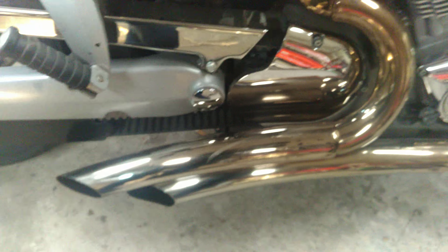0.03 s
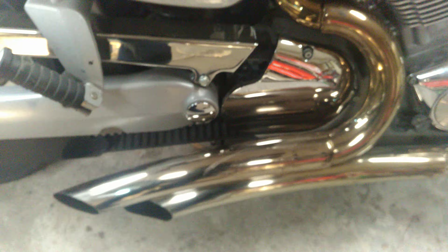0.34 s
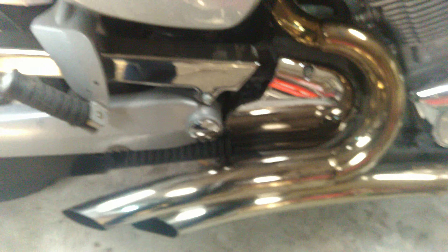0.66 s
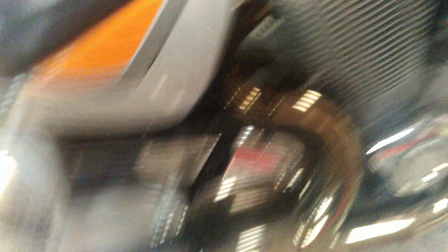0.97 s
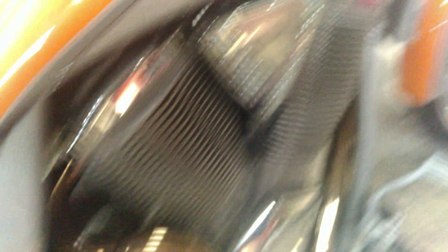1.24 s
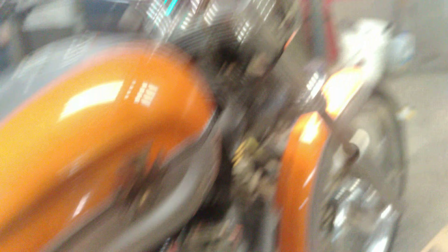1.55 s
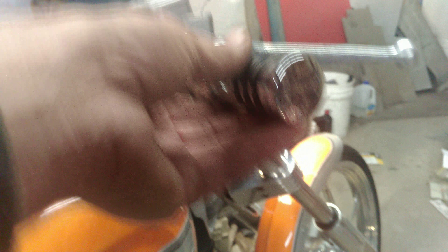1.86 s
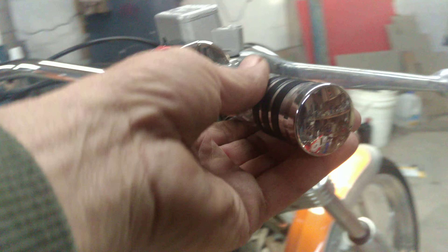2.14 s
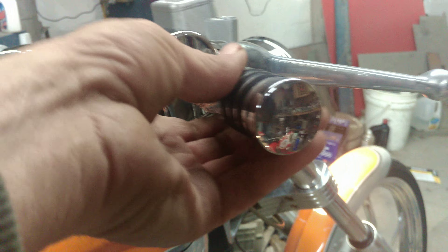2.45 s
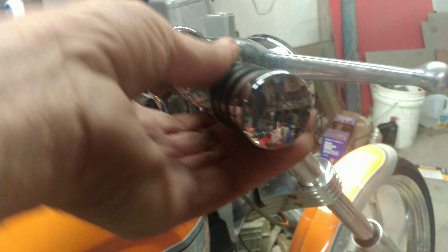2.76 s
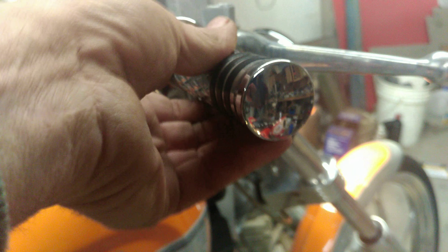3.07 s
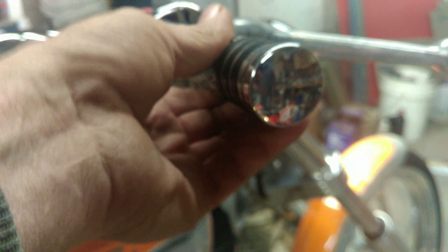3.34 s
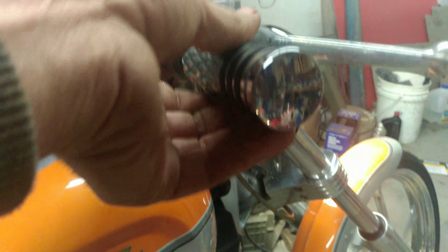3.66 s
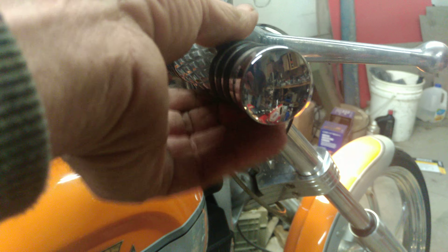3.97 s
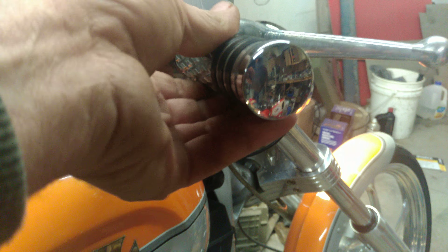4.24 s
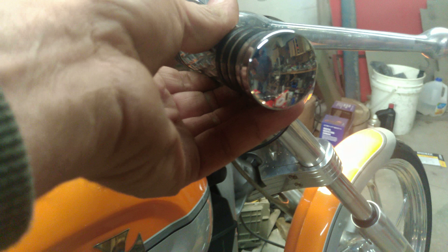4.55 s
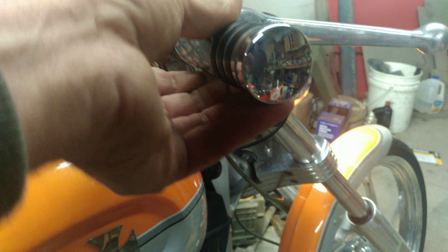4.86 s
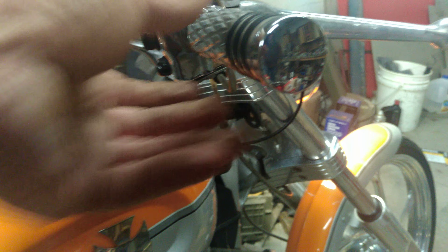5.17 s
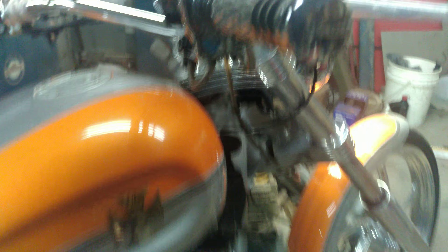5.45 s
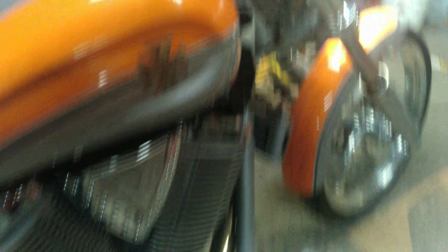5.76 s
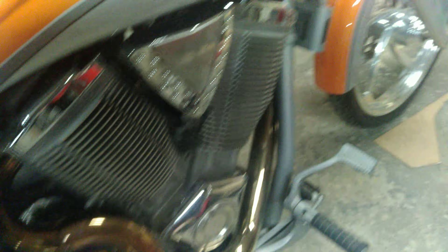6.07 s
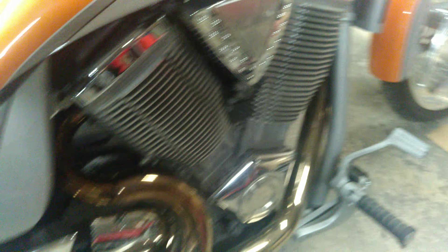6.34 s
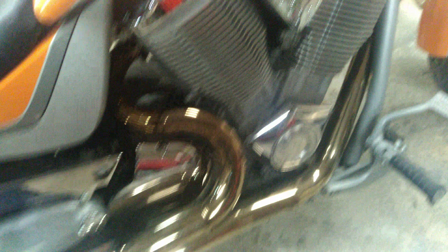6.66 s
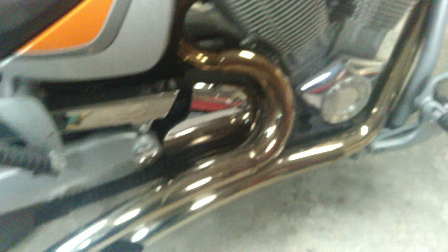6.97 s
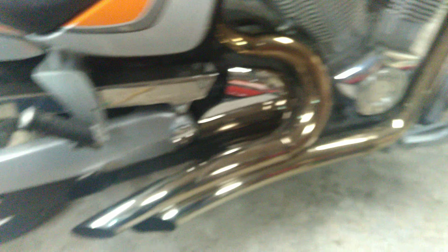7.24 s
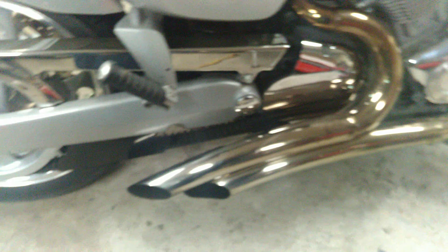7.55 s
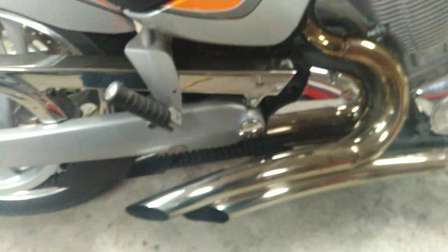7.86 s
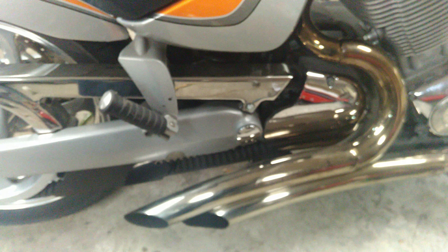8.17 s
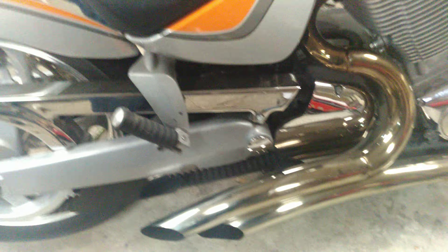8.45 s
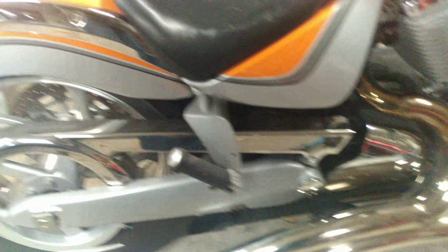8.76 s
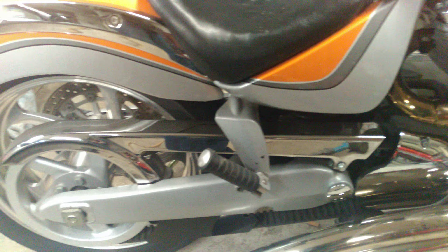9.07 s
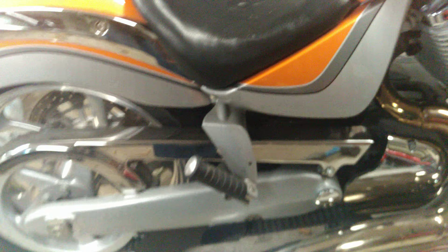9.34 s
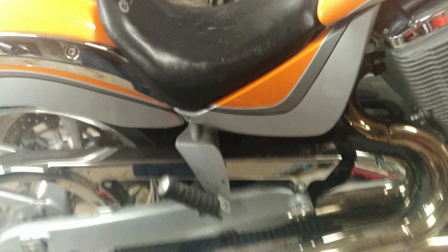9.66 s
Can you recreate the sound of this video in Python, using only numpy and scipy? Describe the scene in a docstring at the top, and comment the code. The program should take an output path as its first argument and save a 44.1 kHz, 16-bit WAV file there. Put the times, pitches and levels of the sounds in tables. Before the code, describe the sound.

Close, thumping motorcycle exhaust idles unevenly, revs twice, the second time ending in a harsh rasp, then sinks back to idle.

```python
"""A V-twin motorcycle with short open pipes idles, nearly stalls, is revved twice and settles again.
Each firing booms in its pipe, barks, and hisses as its pressure pulse hits the microphone port.
The valve gear clatters underneath and the bare garage rings. A close stereo microphone moves between
the pipe mouths and the handlebar and overloads on the revs; a harsh, tearing rasp ends the second."""
import sys
import numpy as np
from scipy import signal
from scipy.fft import rfft, irfft, next_fast_len
from scipy.io import wavfile
from scipy.ndimage import uniform_filter1d

SR = 44100
rng = np.random.default_rng(int(sys.argv[2]) if len(sys.argv) > 2 else 0)


def write(x):
    x = np.atleast_2d(x).T
    wavfile.write(sys.argv[1], SR, np.round(np.clip(x, -1, 1) * 32767).astype(np.int16))


N = 428211
TIME = np.arange(N) / SR


# the engine: slow idle, near stall, two revs, a fast idle that sinks: t/s, cycle rate/Hz
CYCLE_RATE = [(0.0, 7.854), (0.4, 8.132), (0.89, 7.756), (0.99, 8.925), (1.09, 8.08), (1.71, 8.492),
              (1.96, 7.361), (2.08, 8.833), (2.44, 7.956), (2.56, 8.748), (2.96, 6.14), (3.11, 4.821),
              (3.37, 9.892), (3.42, 12.491), (3.66, 22.953), (4.02, 13.652), (4.3, 12.096), (4.44, 15.7),
              (4.72, 25.8), (4.9, 31.2), (4.99, 31.8), (5.06, 29.97), (5.28, 22.245), (5.67, 14.506),
              (5.9, 12.612), (6.15, 12.04), (6.42, 12.186), (6.5, 10.869), (6.76, 12.082), (6.96, 12.018),
              (7.25, 10.88), (7.5, 10.966), (7.74, 11.654), (8.17, 11.551), (8.25, 10.251), (8.4, 10.748),
              (8.73, 10.513), (8.83, 9.725), (9.14, 9.268), (9.71, 9.611)]

def firings(first_cycle=.4335, rear_lag_cycles=.435, jitter_s=0.00057):
    """The crank fires front and rear cylinder in turn; outside the fast idle each pop is a firing."""
    t = np.arange(-SR // 2, N) / SR
    cycles = np.cumsum(curve(CYCLE_RATE, 1, t)) / SR
    cycles -= cycles[SR // 2] + first_cycle
    marks = (np.arange(-1, cycles[-1])[:, None] + [0, rear_lag_cycles]).ravel()
    times = np.interp(marks[marks < cycles[-1]], cycles, t)
    times = times + jitter_s * lumpiness(times) * rng.standard_normal(len(times))
    for at, *_ in POPS:
        if not FAST_IDLE_FROM_S < at < FAST_IDLE_TO_S:
            times[np.argmin(np.abs(times - at))] = at
    return times


# odd burns, nearly all half misfires: t/s, level/dB (scaled by odd_share)
MISFIRES = [(0.426, -2.5), (1.955, -3), (2.029, -7), (2.748, -10), (3.05, -2.5), (7.423, -12), (7.99, -12),
            (8.215, -4), (8.688, -10), (9.522, 2)]

def burns(times, rear_db, scatter_db, odd_share):
    """Size of each firing: the cylinders differ, no two burn alike, and a few half fail."""
    db = rear_db * (np.arange(len(times)) % 2 - .5)
    db += scatter_db * lumpiness(times) * rng.standard_normal(len(times))
    for at, strength_db in MISFIRES:
        db[np.argmin(np.abs(times - at))] += odd_share * strength_db
    return undb(db)


def lumpiness(times, idle_share=0.55, pull_share=0.55, burble=0.6):
    """How much firings differ: 1 at slow idle, less at fast idle and under load, more running down."""
    fast = np.interp(curve(CYCLE_RATE, 1, times), [13, 17], [0, 1])
    load = np.interp(times, TIME, pulling())
    held = np.interp(times, TIME, fast_idle())
    return np.maximum(1 - idle_share * held + fast * (burble * (1 - load) - pull_share * load), .1)


def pulling():
    """1 while the engine gains or holds its speed, 0 as it runs down fast."""
    acceleration = uniform_filter1d(np.gradient(curve(CYCLE_RATE, 1)) * SR, SR // 10)
    return np.interp(acceleration, [-16, -5], [0, 1])


FAST_IDLE_FROM_S, FAST_IDLE_TO_S = 5.7, 8.2

def fast_idle():
    """1 while the engine holds an even fast idle after the second rev."""
    return gate(FAST_IDLE_FROM_S, FAST_IDLE_TO_S, attack=0.24, release=0.088)


# two twists of the throttle: opens/s, shuts/s, opening time/s, opening/0-1
THROTTLE = [(3.234, 3.689, 0.2, 0.67), (4.332, 5.014, 0.027, 0.76)]

def loudness(by_speed, near_db, throttle_db):
    """Level in dB of one layer, set by crank speed, microphone distance and throttle."""
    throttle = sum(opening * gate(opens, shuts, attack, release=0.11)
                   for opens, shuts, attack, opening in THROTTLE)
    return curve(by_speed, 1, curve(CYCLE_RATE, 1)) + near_db * nearness() + throttle_db * throttle


# cylinder and pipe, front then rear: f at opening/Hz, f at shutting/Hz, open time/cycles, swell/dB
CYLINDERS = [(74.3, 112, 0.425, -4), (78.2, 128.7, 0.334, -1)]
# standing waves of the garage: f/Hz, width/Hz, level/dB
ROOM_MODES = [(58, 19, 2.5), (79.9, 15, 4), (94.5, 2.8, 4.5), (102.1, 7.7, 9), (126.9, 9.8, 12)]

def boom(times, sizes, rise_s=0.0029, shut_share=0.034, longest_cycle_s=0.204, scatter=0.053):
    """With its valve open a cylinder rings with its pipe; the rising piston lifts the pitch."""
    out, t = np.zeros(N + SR), TIME[:SR // 10]
    cycle = np.minimum(times[2:] - times[:-2], longest_cycle_s)
    pitch, stretch = (1 + scatter * lumpiness(times)[:, None] * rng.standard_normal((len(times), 2))).T
    for k, (start, size) in enumerate(zip(times, sizes)):
        open_hz, shut_hz, open_share, swell_db = CYLINDERS[k % 2]
        stroke = t / (open_share * stretch[k] ** 2 * cycle[min(k, len(cycle) - 1)])
        travel = np.minimum(stroke, 1)
        hz = pitch[k] * (open_hz + (shut_hz - open_hz) * travel ** 2)
        valve = (1 - np.exp(-t / rise_s)) * (1 - np.tanh((stroke - 1) / (2 * shut_share))) / 2
        wave = -np.cos(2 * np.pi * np.cumsum(hz) / SR) * valve * undb(swell_db * (travel - 1))
        at = int(start * SR) + SR // 2
        out[at:at + len(t)] += np.sqrt(2) * size * wave
    out = out[SR // 2:][:N]
    wet = undb(2 - 10 * nearness())  # from afar the room fills the gaps
    return out + wet * convolve(out, ring(ROOM_MODES)) * 2 * np.pi / SR


# boom of the pipes: cycle rate/Hz, level/dB
BOOM_LEVEL = [(5, -21), (8, -15), (10, -15), (12, -15.5), (15, -12.5), (19, -8), (23, -7), (32, -7)]
# their low note at speed: f/cycle rate, level/dB
LOW_ORDERS = [(3, -18), (4, -11), (5, 3), (6, -14), (7, -19)]
# extra boom as the engine runs down after each rev: start/s, end/s
OVERRUN = [(3.72, 3.87), (5.31, 5.49)]

def low_pipes(times, tearing_db=-1, overrun_db=3.0):
    """Separate thumps at idle run together into a note at speed, which breaks up in the tearing rasp."""
    fast = np.interp(curve(CYCLE_RATE, 1), [14.5, 18], [0, 1])
    note_share = np.clip(0.95 * (1 - 0.95 * tearing_envelope(release=0.013)) * fast, 0, .92)
    sizes = burns(times, rear_db=3.5, scatter_db=1.5, odd_share=0.39)
    thumps = steady(boom(times + 0.00055, sizes), 0.2)
    tone = note(LOW_ORDERS, waver_db=3.0, waver_rad=0.39, waver_hz=30)
    level_db = loudness(BOOM_LEVEL, near_db=7, throttle_db=6.0) + tearing_db * tearing_envelope()
    level_db += overrun_db * sum(gate(start, end, .04, 0.017) for start, end in OVERRUN)
    return (np.sqrt(1 - note_share) * thumps + np.sqrt(note_share) * tone) * undb(level_db)


# upper resonances of pipes and garage: f/Hz, width/Hz, level/dB
BARK_MODES = [(155.6, 16.6, 2), (206.3, 22.6, 1.5), (235.8, 2.3, -2), (265.1, 11, 5.5), (225, 42, -14.5)]

def bark(times, sizes, gust_db=-16, spread_s=.04, thud_hz=212, thud_s=0.01051, thud_db=9):
    """The sharp front of each blowdown thuds and rings the upper resonances; weaker gusts follow."""
    chance = rng.random((len(times), 2, 4))
    gust_times = times[:, None] + spread_s * chance[:, 0]
    gust_sizes = (sizes * lumpiness(times))[:, None] * (4 * chance[:, 1] - 2)
    gusts = pulses(gust_times.ravel(), gust_sizes.ravel())
    response = echoed(band(ring(BARK_MODES), 129, 314.7, order=4))
    t = TIME[:int(thud_s * SR)]
    window = np.sin(np.pi * t / thud_s) ** 2
    thud = undb(thud_db) * window * np.cos(2 * np.pi * thud_hz * (t - thud_s / 2))
    fronts = pulses(times, sizes)
    return convolve(fronts, thud) - convolve(fronts + undb(gust_db) * gusts, response)


# bark of the pipes: cycle rate/Hz, level/dB
BARK_LEVEL = [(5, -33), (8, -25), (9.7, -22.5), (11, -19.5), (16, -14), (23, -7.5), (32, -4.5)]
# harmonics of the roar and of the fast-idle hum: f/cycle rate, level/dB
ROAR_ORDERS = [(8, -19), (9, -2), (10, -2.5), (11, -8), (12, -3), (13, -14), (14, -8.5)]
HUM_ORDERS = [(10, -4), (12, -1.5), (15, -8), (16, 0.5), (17, -3), (19, 1.5), (20, -4.5), (21, -0.5),
              (22, -2), (25, -6.5), (26, -6.5), (27, -5.5), (28, -13.5), (29, -1), (33, -13)]

def high_pipes(times, tearing_db=-5, fast_idle_db=2.0):
    """The bark hums at fast idle and turns to a roar as the engine pulls at speed; drones ride on it."""
    roar_share = pulling() * np.interp(curve(CYCLE_RATE, 1), [15, 25], [0, 0.78])
    hum_share = 0.48 * (1 - roar_share) * fast_idle()
    bark_share = np.maximum(1 - roar_share - hum_share, 0)
    sizes = burns(times, rear_db=-3.0, scatter_db=2.0, odd_share=0.34)
    barks = np.sqrt(bark_share) * steady(bark(times, sizes), 0.23)
    roar = np.sqrt(roar_share) * note(ROAR_ORDERS, waver_db=3.0, waver_rad=0.62, waver_hz=35)
    hum = np.sqrt(hum_share) * note(HUM_ORDERS, waver_db=0.5, waver_rad=0.073, waver_hz=5.5)
    level_db = loudness(BARK_LEVEL, near_db=6.0, throttle_db=6)
    level_db += tearing_db * tearing_envelope() + fast_idle_db * fast_idle()
    return (barks + roar + hum + drones(times)) * undb(level_db)


# how the pipes favour harmonics that sweep through them: f/Hz, level/dB
PIPE_GAIN = [(60, -11), (82, -6), (100, 6.5), (125, 2), (160, -3), (195, -2), (222, -3), (248, -2.5),
             (265, -6), (285, 3), (325, -4), (380, -12.5), (450, -11)]

def note(orders, waver_db, waver_rad, waver_hz):
    """Harmonics locked to the crank; each wavers, and swells as it passes a resonance of the pipes."""
    speed = curve(CYCLE_RATE, 1)
    turn = 2 * np.pi * np.cumsum(speed) / SR
    out, power = 0, 0
    for k, db in orders:
        size = undb(db + curve(PIPE_GAIN, 1, k * speed))
        waver = undb(waver_db * wander(waver_hz))
        phase = k * turn + 2 * np.pi * rng.random() + waver_rad * wander(waver_hz)
        out += size * waver * np.cos(phase)
        power += size ** 2
    return unit(out / np.sqrt(power))


# passing drones: start/s, end/s, f/Hz, width/Hz, level against the bark/dB
DRONES = [(0, 3.3, 165, 9.5, -7.5), (0, 1.5, 364, 40, -23), (1.799, 3.4, 313.4, 23, -10.5),
          (3.5, 4.1, 279.3, 10, -8), (4.45, 4.87, 282.6, 12, -8), (5.151, 5.5, 326, 14, -3.5),
          (5.3, 6.15, 269.2, 6.7, -6.5), (5.85, 6.3, 343, 8.2, -12), (7.0, 7.7, 304, 7.6, -11)]

def drones(times, jitter_s=0.00064):
    """Uneven firings keep narrow resonances humming."""
    uneven = times + jitter_s * lumpiness(times) * rng.standard_normal(len(times))
    drive = pulses(uneven, np.ones(len(times)))
    out = 0
    for start, end, hz, width, db in DRONES:
        hum = band(convolve(drive, ring([(hz, width, 0)])), 0.936 * hz, 1.075 * hz)
        out += steady(hum, 0.3) * undb(db) * gate(start, end, attack=0.063, release=0.017)
    return out


# bright hiss at the microphone port: f/Hz, level/dB
HISS_COLOUR = [(700, -8), (1400, -2.5), (1850, -0.5), (2600, -3), (4000, -1.5), (6000, -3), (8500, -1.5),
               (10000, 1.5), (11800, 8.5), (13500, 6.5), (15800, -4)]
# its strength: cycle rate/Hz, level/dB
HISS_LEVEL = [(5, -33), (8, -27), (12, -29), (16, -20.5), (21, -22), (32, -29.5)]
# the treble of hiss and clatter rises and dips: t/s, level/dB
TREBLE = [(3.2, -2), (3.46, -1), (3.57, -3.5), (3.7, -3.5), (3.85, -1), (3.98, -4), (4.2, 0), (4.35, -5.5),
          (4.5, -5.5), (5.0, 3), (5.55, -5), (5.7, -1), (5.8, -6), (6.0, 0.5), (6.1, -3), (6.15, -8),
          (6.32, -5.5), (6.38, -1.5), (6.5, 0.5), (7.0, -5.5), (7.2, -1), (8.25, -1.5), (8.45, 0.5),
          (8.85, 0), (9.71, -1.5)]

def port_hiss(times, far_smear=0.84):
    """A puff of bright hiss with each firing, as its pressure pulse hits the microphone port."""
    speed = curve(CYCLE_RATE, 1, times)
    level_db = np.interp(times, TIME, loudness(HISS_LEVEL, near_db=2.0, throttle_db=11.0))
    level_db += curve(TREBLE, 1, times)
    sizes = undb(level_db) * burns(times, rear_db=0.4, scatter_db=2.2, odd_share=0.91)
    energy = sizes ** 2 * SR / (2 * speed)
    # crisp beside the pipes, drawn out at speed and from afar
    smear = np.clip(np.interp(speed, [12, 17], [0, 1]) + far_smear * (1 - nearness(times)), 0, 1)
    crisp, drawn = puff(0.00023, 0.0029, -6.0, 0.02), puff(0.0041, .006, 7.7, 0.028)
    power = convolve(pulses(times, energy * (1 - smear)), crisp / crisp.sum())
    power += convolve(pulses(times, energy * smear), drawn / drawn.sum())
    return stereo_noise(HISS_COLOUR) * np.sqrt(np.abs(power))


# pops at the pipe mouths: t/s, crack level/dB, levels of the low, middle and high wall mode/dB
POPS = [(0.056, -9.5, -38.5, -31, -45), (0.1081, -19, -37, -35, -35), (0.179, -9, -43, -34, -34),
        (0.2369, -17, -32, -39.5, -40), (0.3636, -13, -35, -34, -37), (0.483, -17, -36, -44, -33),
        (0.609, -6.5, -34, -30, -28), (0.6789, -9, -31, -33, -32), (0.9339, -12, -35, -51, -46),
        (0.985, -11, -27.5, -39, -43), (1.05, -11, -40, -34, -40), (1.1013, -15, -31, -39, -34),
        (1.2256, -17, -38.5, -33, -32), (1.8262, -12.5, -34, -37, -33), (2.0796, -13.5, -39, -40, -37),
        (2.8927, -18, -35, -46, -47), (4.148, -10, -43, -41, -44), (4.3282, -10.5, -39, -37, -42),
        (5.8475, -15, -42, -44, -42), (6.0536, -15, -40, -42, -42), (6.516, -13.5, -34, -47, -44),
        (6.598, -21, -32, -49, -48), (6.8138, -15, -38, -42, -44), (7.0648, -13, -34, -38, -41),
        (7.1532, -11, -40, -29, -32), (7.2421, -12, -30, -45, -36), (7.2837, -16, -43, -46, -38),
        (7.375, -13, -37, -36, -35), (7.5175, -21, -46, -45, -39), (7.5562, -16, -42, -44, -37),
        (7.6466, -10.5, -42, -30, -40), (7.8189, -15, -40, -34, -40), (7.9533, -12, -44, -39, -39),
        (8.0784, -15, -39, -32, -41), (8.1247, -10.5, -44, -40, -37), (8.3097, -13.5, -36, -43, -46),
        (8.403, -9, -33, -36, -35), (8.4435, -8.5, -34, -39, -38), (8.4972, -12, -40, -41, -39),
        (8.536, -12, -35, -37, -37), (8.5897, -10, -42, -45, -43), (8.782, -3.5, -31, -34, -34),
        (8.826, -7, -29, -33.5, -48), (8.8836, -4, -29, -33, -38), (8.928, -7.5, -35, -38, -40),
        (8.99, -11.5, -40, -32, -48), (9.0341, -10, -36, -36, -37), (9.0929, -5.5, -30, -27, -32),
        (9.141, -7.5, -27, -33, -37), (9.203, -10, -32, -29, -40), (9.2504, -21, -35, -30, -44),
        (9.3093, -5.5, -30, -28, -32), (9.3543, -5.5, -32, -34, -42), (9.413, -17, -33, -28, -50),
        (9.461, -11, -35, -28, -52), (9.5673, -13, -34, -25.5, -46), (9.625, -6, -37, -37, -29),
        (9.671, -9, -38, -33, -39)]
# wall modes that a pop rings: f/Hz, width/Hz, power decay/s, level/dB
POP_MODES = [(1020, 156, 0.013, -0.5), (1820, 350, 0.0065, 3.5), (2593, 510, 0.014, -1)]
# the crack of a pop: f/Hz, level/dB
CRACK_COLOUR = [(1500, -29), (3000, -9), (4200, 3), (6500, 0), (9000, 0.5), (11800, 10.5), (13500, 7),
                (15800, 5)]

def pops(crack_db=-6.0, spit_db=-9):
    """A hard burn cracks at the pipe mouth and rings the thin walls, each time in another blend."""
    times, peak_db, *wall_db = np.transpose(POPS)
    crack = bursts(times, undb(peak_db + crack_db), puff(.0002, .0034, -8, .016))
    spit = bursts(times, undb(peak_db + spit_db), puff(.00006, .001, -20, .004))
    out = stereo_noise(CRACK_COLOUR) * crack + stereo_noise(CRACK_COLOUR) * spit
    for (hz, width, decay, db), ring_db in zip(POP_MODES, wall_db):
        wall = unit(band(rng.standard_normal((2, N)), hz - width / 2, hz + width / 2))
        out += wall * bursts(times, undb(ring_db + db), puff(.0004, decay, -15, .03))
    return out


# turbulence in the pipe mouths: f/Hz, level/dB
RASP_COLOUR = [(300, -5), (390, 5), (470, -7), (560, 0), (700, -11), (900, -4), (1100, -9), (1400, -25),
               (1850, -20), (2600, -21), (5000, -31)]
# its strength: cycle rate/Hz, level/dB
RASP_LEVEL = [(5, -49), (8, -39.5), (12, -33.5), (15, -30.5), (19, -17), (23, -18), (32, -11.5)]
# pipe walls and engine castings: f/Hz, width/Hz, level/dB
METAL_MODES = [(483, 100, 8.5), (573.4, 9.2, 8), (688, 84, 8), (781, 12, 4.5), (888, 22, 2.5),
               (1006, 6.4, 12.5), (1138, 2.7, 5.5), (1550, 31, 0.5), (1700, 32, -10), (1880, 15.5, -26),
               (2010, 6.1, -4)]

def rasp(times, flow_db=-4, metal_db=-2, side_db=-4, scatter_db=4.9):
    """Turbulence in the pipe mouths swells with every firing and sets the metal ringing."""
    sizes = undb(scatter_db * rng.standard_normal(len(times)))
    flow = steady(bursts(times, sizes, puff(0.00061, 0.0052, 7, 0.18)), 0.49)
    knocks = rng.standard_normal((2, N)) * bursts(times, sizes, puff(0.00082, 0.00077, 1, 0.052))
    metal = np.array([steady(convolve(knock, ring(METAL_MODES)), 0.12) for knock in knocks])
    mid, side = undb(flow_db) * stereo_noise(RASP_COLOUR) * flow + undb(metal_db) * metal
    stereo = at_ports(mid) + undb(side_db) * np.array([side, -side])
    return stereo * undb(loudness(RASP_LEVEL, near_db=3.5, throttle_db=2.0))


# the tearing rasp that ends the second rev: f/Hz, level/dB
TEARING_COLOUR = [(350, -16), (600, 3), (678, 4), (941, 4), (1220, -2), (1790, 0), (1940, -1.5),
                  (8470, -10.5), (13100, -3.5), (15700, -12.5)]

def tearing(times, level_db=-2.5, howl_hz=468, howl_width_hz=30, howl_db=-13, scatter_db=1.4):
    """A harsh, tearing rasp and a howl as the throttle snaps shut, probably the microphone overloading."""
    sizes = undb(scatter_db * rng.standard_normal(len(times)))
    flutter = steady(bursts(times, sizes, puff(0.00085, 0.0054, 7.7, 0.049)), 0.64)
    howl = convolve(rng.standard_normal(N), ring([(howl_hz, howl_width_hz, 0)]))
    howl = undb(howl_db) * unit(band(howl, 330, 660))
    return (spread_noise(TEARING_COLOUR) + howl) * flutter * tearing_envelope() * undb(level_db)


def tearing_envelope(start_s=5.018, sag_from_s=5.136, end_s=5.262, release=0.051, sag_db_per_s=22):
    """The tearing rasp starts at once, holds and tapers."""
    sag = undb(-sag_db_per_s * np.maximum(TIME - sag_from_s, 0))
    return gate(start_s, end_s, 0.0099, release) * sag


def spread_noise(points):
    """Noise whose lows are much alike at both ports and whose treble is spread wide."""
    shared = colour(at_ports(stereo_noise(points)[0]), [(600, -1.2), (1200, -3), (3000, -10)])
    wide = colour(stereo_noise(points), [(600, -6), (1200, -3), (3000, -.5)])
    return shared + wide


def backfire(at_s=3.724, low_hz=620, high_hz=1200, level_db=-6):
    """One hollow bang in the pipes just after the first blip shuts."""
    noise = unit(band(rng.standard_normal((2, N)), low_hz, high_hz))
    return noise * gate(at_s, at_s, attack=0.00094, release=0.013) * undb(level_db)


# thin walls of the front and the rear pipe: f/Hz, width/Hz, level/dB
FRONT_WALL = [(1010, 63, 1), (1710, 100, -3)]
REAR_WALL = [(1100, 81, -10), (1950, 190, -11), (2400, 270, 3)]

def wall_clack(times, front_db=-58, rear_db=-59, near_db=14):
    """Each firing rattles the thin wall of its own pipe; it is heard only close by."""
    sizes = burns(times, rear_db=0, scatter_db=2.0, odd_share=.6)
    out = 0
    for k, (wall, level_db) in enumerate([(FRONT_WALL, front_db), (REAR_WALL, rear_db)]):
        hits = bursts(times[k::2], sizes[k::2], puff(.0006, 0.0013, -12, 0.022))
        rattle = convolve(rng.standard_normal((2, N)) * hits, ring(wall)[None])
        out += undb(level_db) * unit(band(rattle, 1100, 2540, order=4))
    return out * undb(near_db * nearness())


# valve gear and chain: f/Hz, level/dB
CLATTER_COLOUR = [(500, 16.5), (1000, 8), (1400, 4), (1900, 4), (3000, 0.5), (6000, 0.5), (8500, -2.5),
                  (11800, 5), (13500, -1), (15800, 6)]
# their strength: cycle rate/Hz, level/dB
CLATTER_LEVEL = [(5, -24.5), (8, -20), (12, -16.5), (19, -7), (32, -18)]

def clatter(times, scatter_db=4, spread_s=0.032, whirr_power=0.022, tick_power=0.089):
    """Valves and chain tick at odd moments between the firings, over a steady whirr."""
    tick_times = (times[:, None] + spread_s * rng.random((len(times), 4))).ravel()
    sizes = undb(scatter_db * rng.standard_normal(len(tick_times)))
    ticks = unit(bursts(tick_times, sizes, puff(0.0006, 0.00048, -3, 0.045)))
    level_db = loudness(CLATTER_LEVEL, near_db=-5, throttle_db=13.0) + curve(TREBLE, 1)
    return stereo_noise(CLATTER_COLOUR) * np.sqrt(whirr_power + tick_power * ticks ** 2) * undb(level_db)


def valve_knock(times, hz=588, width_hz=30, lag_cycles=0.32, scatter_db=2.5, bounce_s=0.01405):
    """The rear exhaust valve shuts with a hollow knock and a bounce, clearest close by at slow idle."""
    rear = times[1::2]
    cycle = np.minimum(np.gradient(rear), .135)
    shuts = rear + lag_cycles * cycle
    sizes = undb(-34.5 + 14 * nearness(rear)) * (cycle / cycle.max()) ** 2
    sizes *= undb(scatter_db * rng.standard_normal(len(rear)))
    bounces = pulses(shuts + bounce_s * rng.random(len(rear)), .5 * sizes)
    return band(convolve(pulses(shuts, sizes) + bounces, ring([(hz, width_hz, 0)]) / width_hz), 200, 750)


# cylinder heads and fins: f/Hz, width/Hz, level/dB
HEAD_MODES = [(675, 17, 1), (735, 36, -1.5), (796, 23, -2.5), (908, 23, -1), (1033, 21, -2.5),
              (1107, 24, -4), (1785, 47, -3.5), (1950, 62, -5)]
# their ring as the microphone passes them: t/s, level/dB
HEAD_LEVEL = [(0, -48), (1.3, -39.5), (2, -43), (5.5, -47), (5.9, -38), (6.33, -43), (6.43, -34.5),
              (6.7, -41), (7.1, -45), (7.8, -45), (8.5, -38), (9.71, -37)]

def valves(times, late_share=.45, late_db=-3, scatter_db=2.0):
    """The valves strike twice per firing and ring the cylinder heads."""
    strikes = np.c_[times, times + late_share * np.gradient(times)]
    sizes = undb(np.array([0, late_db]) + scatter_db * rng.standard_normal(strikes.shape))
    ringing = convolve(pulses(strikes.ravel(), sizes.ravel()), ring(HEAD_MODES))
    ringing = steady(band(ringing, 590, 2900), .4) * undb(curve(HEAD_LEVEL, 1))
    return at_ports(ringing) + garage(ringing, t60=0.47, level_db=-5)


# first echoes off the garage floor and walls: delay/s, gain/ratio
ECHOES = [(.0072, -0.92), (0.0167, 0.43), (0.0214, .35)]

def echoed(response):
    """Add the echoes of floor and walls; the first 40 ms come out at rms 1."""
    t = TIME[:len(response)]
    out = response + sum(gain * np.interp(t - delay, t, response, left=0) for delay, gain in ECHOES)
    return out / np.sqrt(np.mean(out[:SR // 25] ** 2))


def garage(x, t60=1.0, level_db=-16, build_s=0.067):
    """Diffuse ring of the bare walls, different left and right and weak in the deep bass."""
    t = TIME[:SR // 2]
    tail = rng.standard_normal((2, len(t))) * undb(-60 * t / t60) * (1 - np.exp(-t / build_s))
    tail /= np.sqrt(np.sum(tail ** 2, axis=1, keepdims=True))
    return undb(level_db) * colour(convolve(x[None], tail), [(60, -4), (110, -2), (250, 2), (500, 2)])


# path of the microphone along the motorcycle: t/s, nearness/0-1
MIC_PATH = [(0, 0.86), (1.05, 0.77), (1.8, 0.086), (2.3, 0.034), (5.7, 0.059), (6.5, 0.55), (7.3, 0.7),
            (8.3, 0.73), (8.8, 1), (9.71, 0.86)]

def nearness(at=TIME):
    """Place of the microphone: 0 at the handlebar, 1 beside the pipe mouths."""
    return curve(MIC_PATH, 1, at)


# the microphone turns: t/s, lag of its left port behind the right/s
LEFT_LAG = [(0, 0), (1.7, .00022), (5.7, .00024), (7.6, 0), (8.3, -.00026), (9.71, -.00022)]

def at_ports(x):
    """The sound reaches one microphone port a little before the other."""
    lag = curve(LEFT_LAG, 1) / 2
    return np.array([np.interp(TIME - side * lag, TIME, x) for side in (1, -1)])


def puff(rise, decay, tail_db, tail):
    """Power of a puff: a quick rise, a fast fall and a longer tail in the garage; times in s."""
    t = TIME[:SR // 4]
    return (1 - np.exp(-t / rise)) ** 2 * (np.exp(-t / decay) + undb(tail_db) ** 2 * np.exp(-t / tail))


def bursts(times, sizes, shape):
    """Amplitude envelope of puffs whose powers add."""
    return np.sqrt(np.abs(convolve(pulses(times, sizes ** 2), shape)))


def pulses(times, sizes):
    """One impulse at each time."""
    return np.bincount(np.clip(times * SR, 0, N - 1).astype(int), sizes * (times >= -.03), N)


def ring(modes):
    """Response of damped resonances to one push."""
    t = TIME[:SR // 3]
    return sum(undb(db) * width * np.exp(-np.pi * width * t) * np.cos(2 * np.pi * hz * t)
               for hz, width, db in modes)


def gate(start, end, attack, release):
    """Envelope that opens at start, holds, and dies away after end; times in s."""
    return np.clip((TIME - start) / attack, 0, 1) * np.exp(-np.maximum(TIME - end, 0) / release)


def steady(x, window_s):
    """Hold a pulsing sound near rms 1 without flattening its pulses."""
    size = int(window_s * SR)
    power = uniform_filter1d(uniform_filter1d(x ** 2, size), size)
    return x / np.sqrt(np.abs(power) + 1e-3 * np.mean(x ** 2))


def wander(rate_hz):
    """Random drift with a spread near 1."""
    return np.interp(TIME, np.arange(600) / rate_hz, rng.standard_normal(600))


def curve(rows, column, at=TIME):
    """One column of a table, joined by straight lines."""
    rows = np.asarray(rows)
    return np.interp(at, rows[:, 0], rows[:, column])


def colour(x, points):
    """Shape a sound by points of f/Hz, level/dB."""
    hz, db = np.transpose(points)
    size = next_fast_len(N + 4096)
    f = np.maximum(np.fft.rfftfreq(size, 1 / SR), 1)
    return irfft(rfft(x, size) * undb(np.interp(np.log(f), np.log(hz), db)), size)[..., :N]


def stereo_noise(points):
    return unit(colour(rng.standard_normal((2, N)), points))


def convolve(x, response):
    return signal.fftconvolve(x, response, axes=-1)[..., :N]


def band(x, low_hz, high_hz, order=2):
    return signal.sosfilt(signal.butter(order, [low_hz, high_hz], "band", fs=SR, output="sos"), x)


def undb(db):
    return 10 ** (np.asarray(db) / 20)


def unit(x):
    return x / np.sqrt(np.mean(x ** 2))


def scene():
    """The firings drive the pipes and the valve gear, close by in the ringing garage."""
    times = firings()
    pipes = low_pipes(times) + high_pipes(times) + valve_knock(times)
    out = at_ports(pipes) + garage(pipes) + port_hiss(times) + pops() + wall_clack(times) + rasp(times)
    return out + clatter(times) + valves(times) + tearing(times) + backfire()


# balance of the microphone ports: f/Hz, left minus right level/dB
PORT_BALANCE = [(100, -1.2), (300, -1.2), (900, 1), (4000, 1), (7000, 4), (10000, 7), (12500, 6),
                (15500, 2)]

def record(dry, knee=21.0, ceiling=1.05, top_hz=15800):
    """Each port colours the sound; the microphone rounds the loudest peaks and cuts deep bass and top."""
    ports = np.array([colour(x, [(hz, side * db / 2) for hz, db in PORT_BALANCE])
                      for x, side in zip(dry, (1, -1))])
    rounded = ports / (1 + np.abs(ports / ceiling) ** knee) ** (1 / knee)
    thinned = colour(rounded, [(10, -30), (28, -24), (48, -2.5)])
    return signal.sosfilt(signal.ellip(10, .1, 70, top_hz, fs=SR, output="sos"), thinned)


dry = scene()
out = record(dry)
write(out)
```